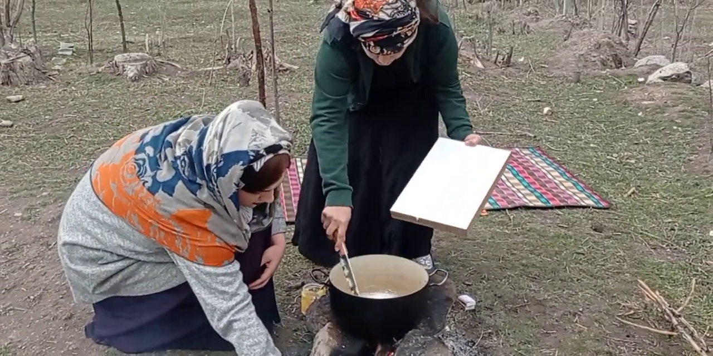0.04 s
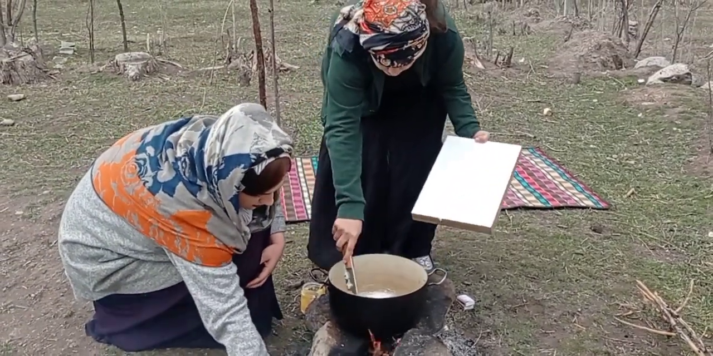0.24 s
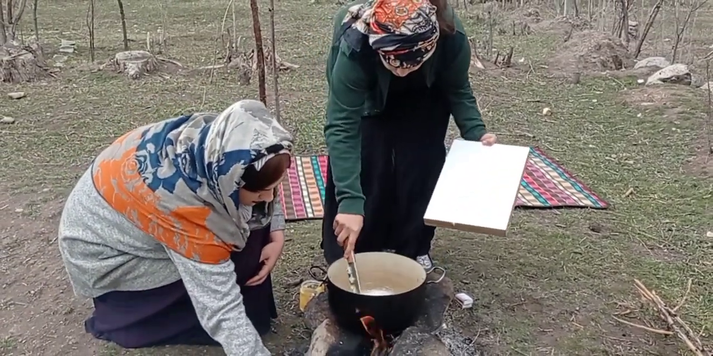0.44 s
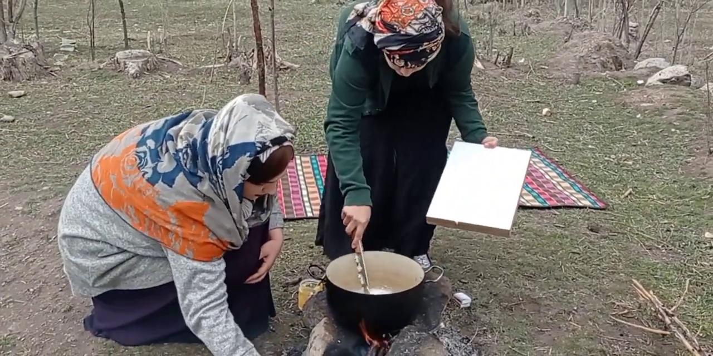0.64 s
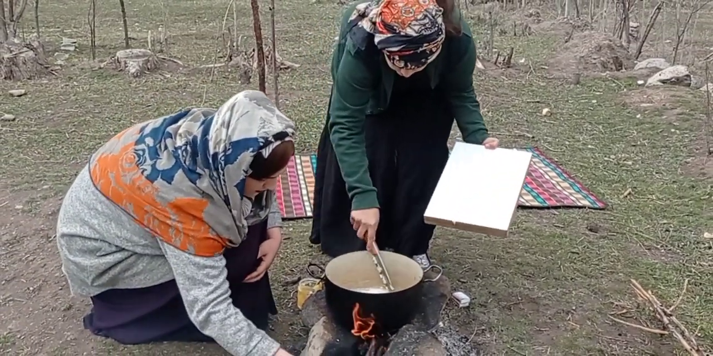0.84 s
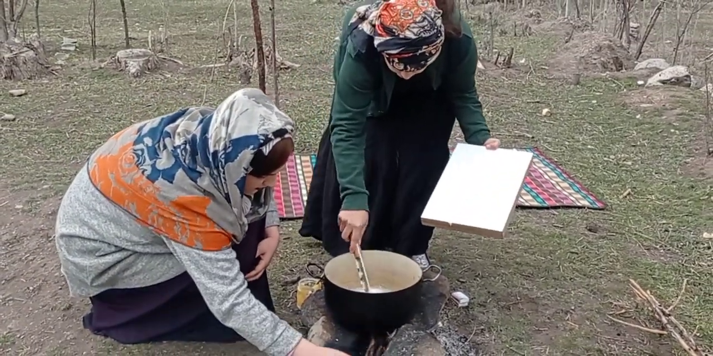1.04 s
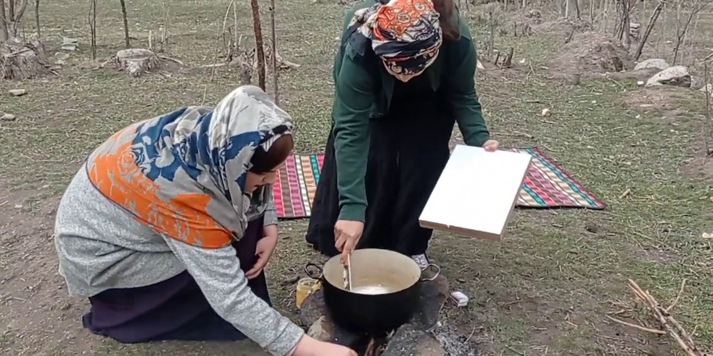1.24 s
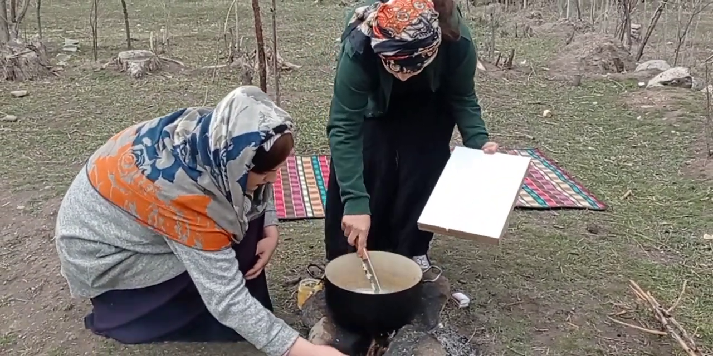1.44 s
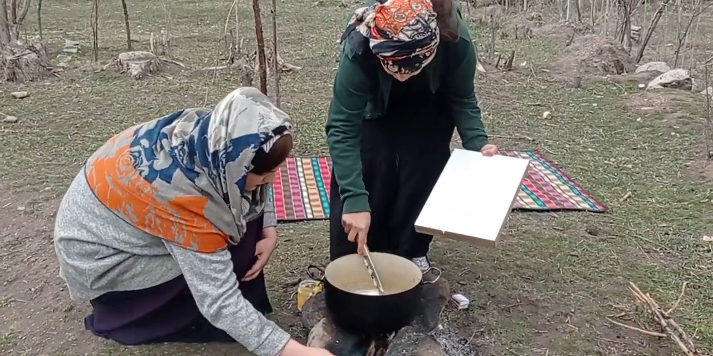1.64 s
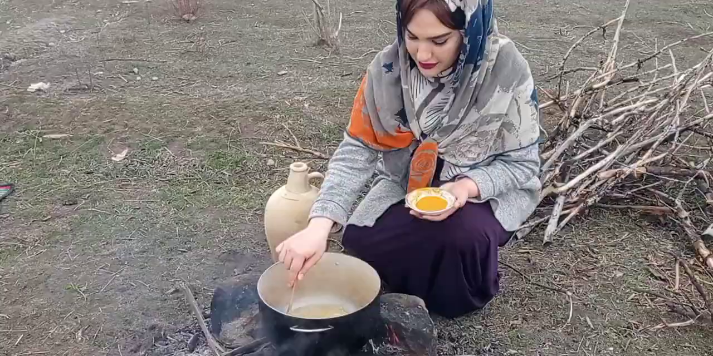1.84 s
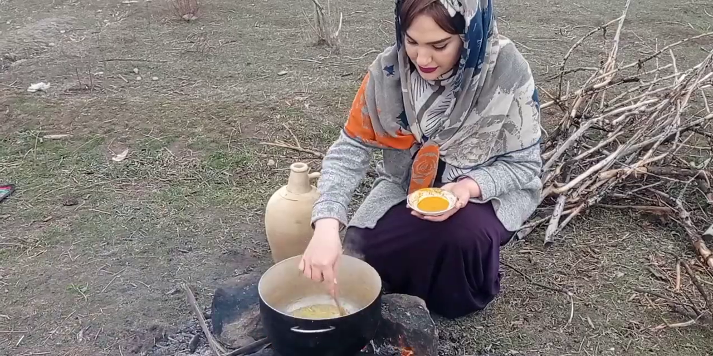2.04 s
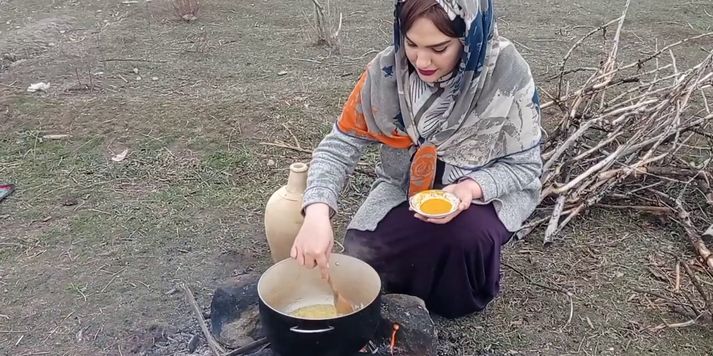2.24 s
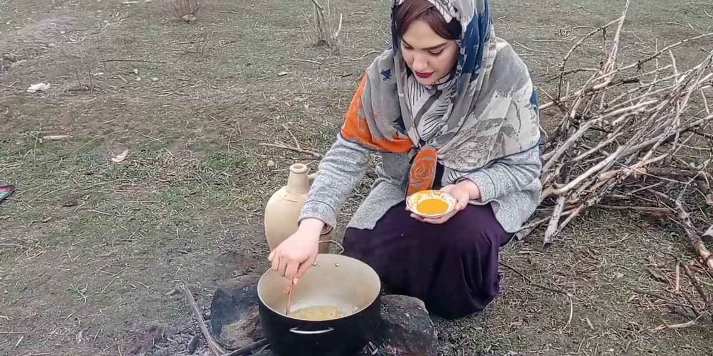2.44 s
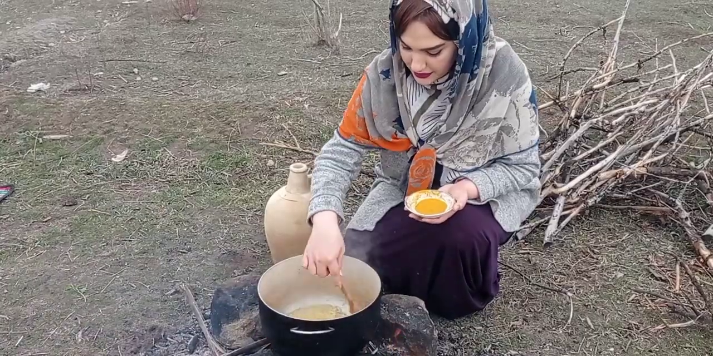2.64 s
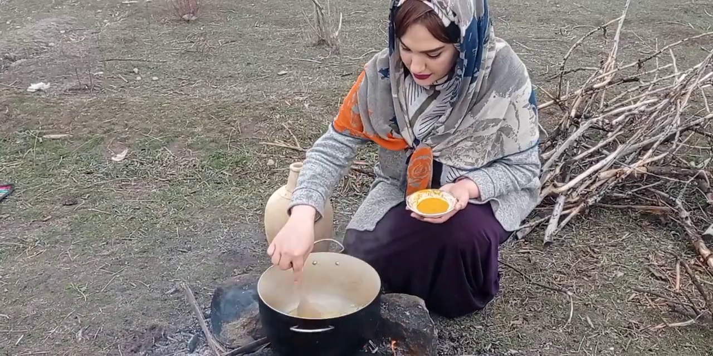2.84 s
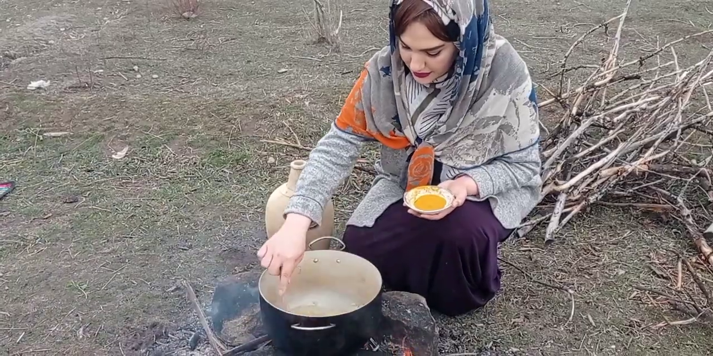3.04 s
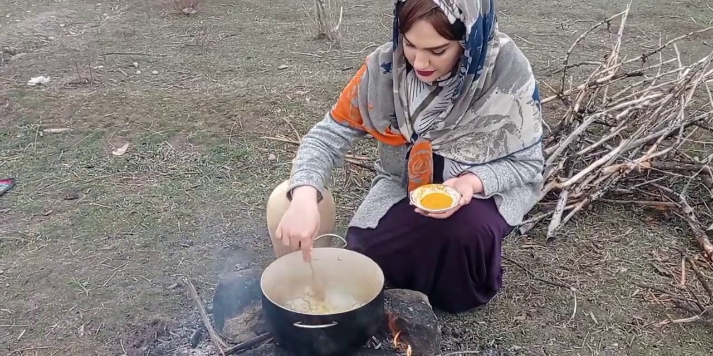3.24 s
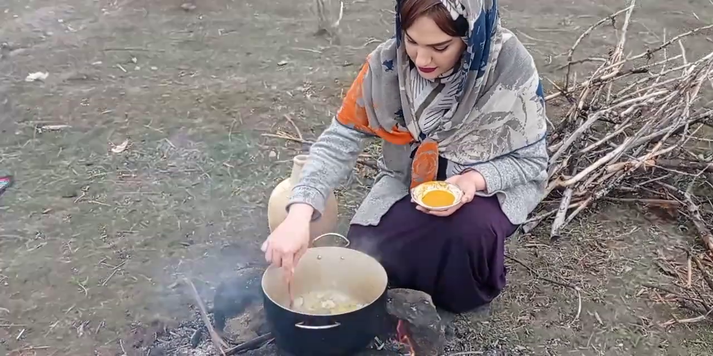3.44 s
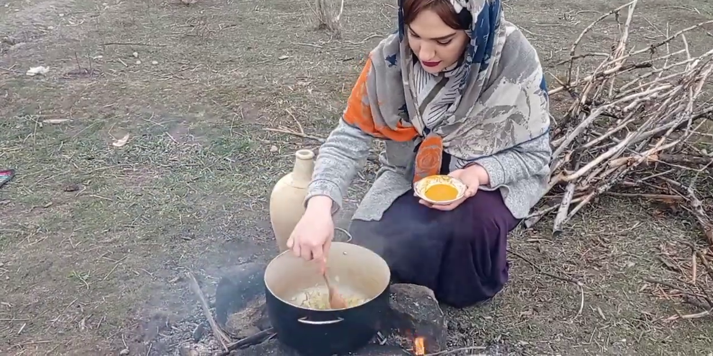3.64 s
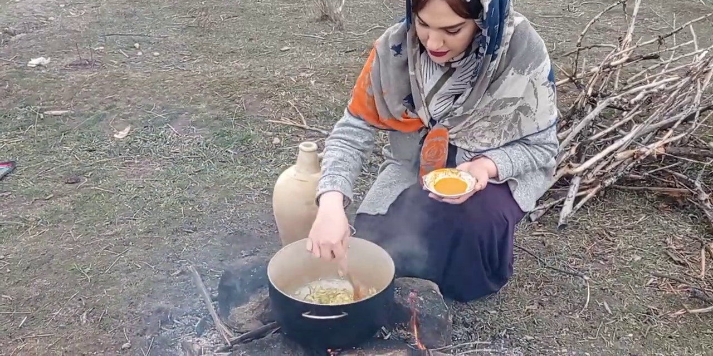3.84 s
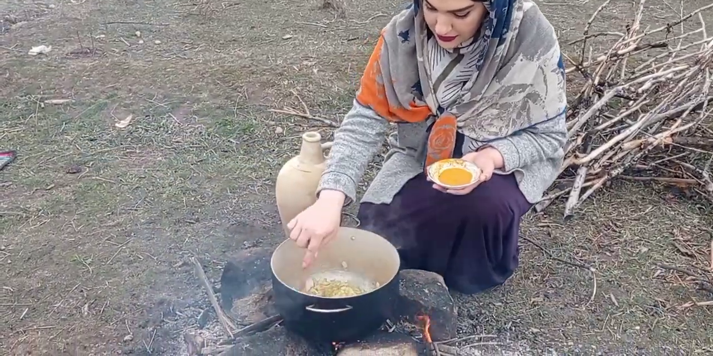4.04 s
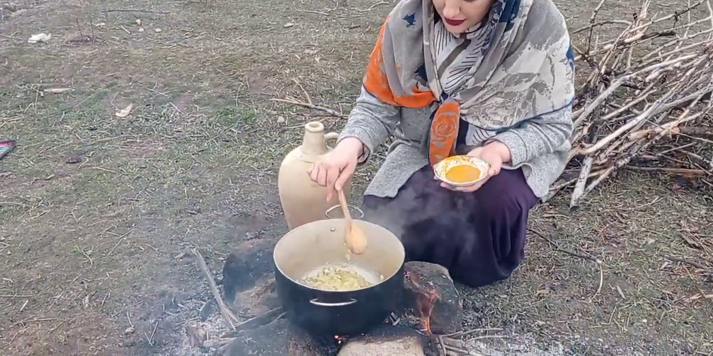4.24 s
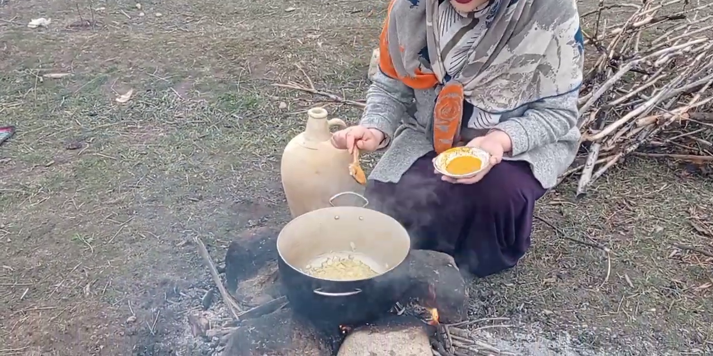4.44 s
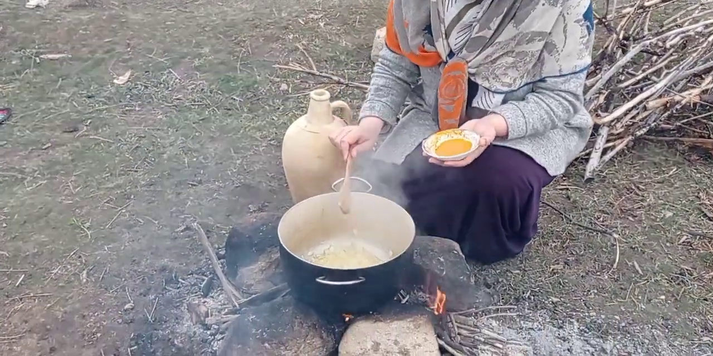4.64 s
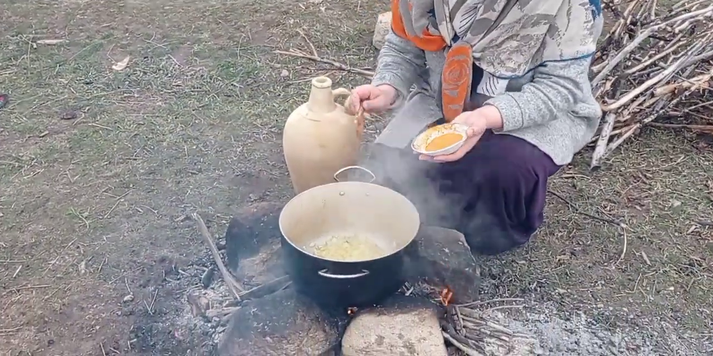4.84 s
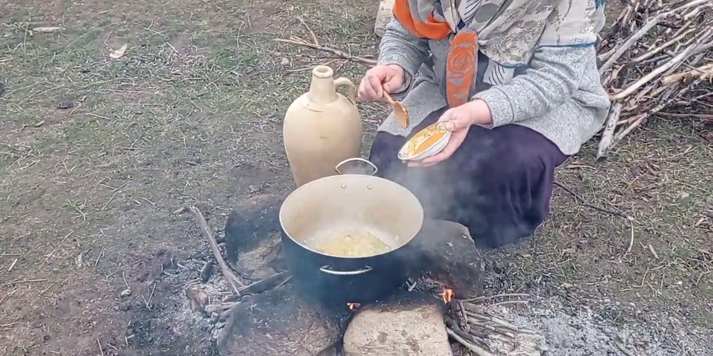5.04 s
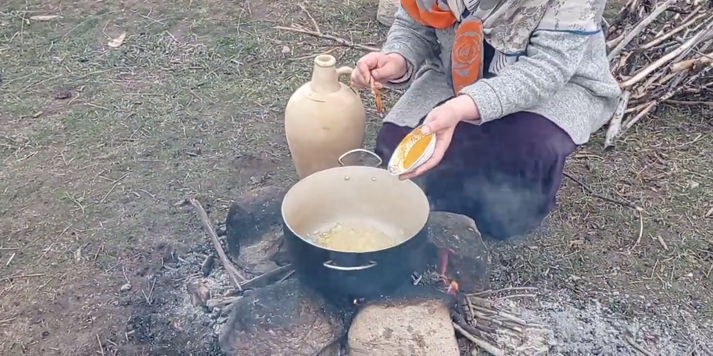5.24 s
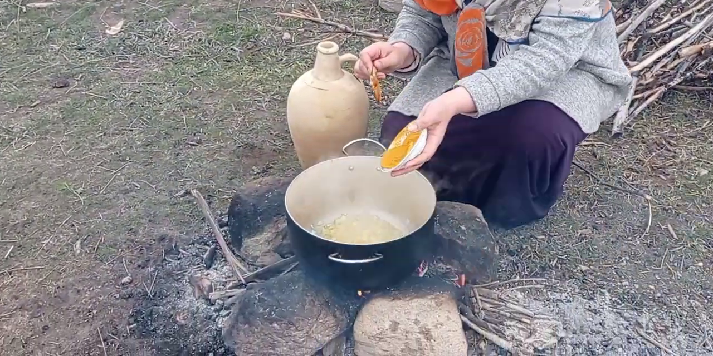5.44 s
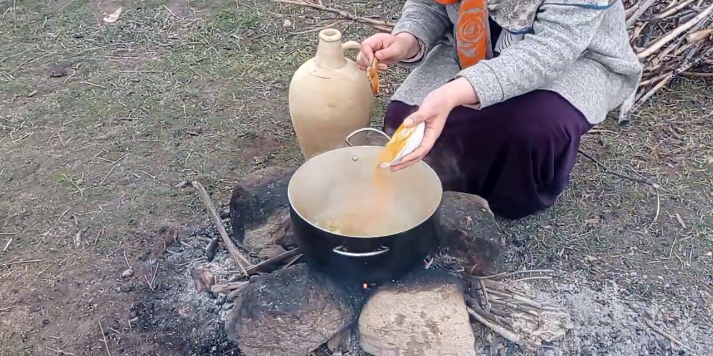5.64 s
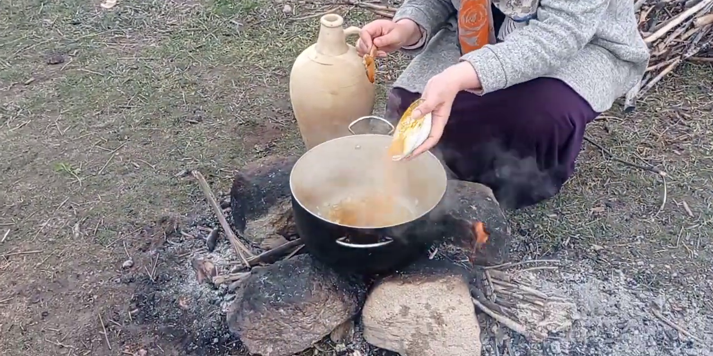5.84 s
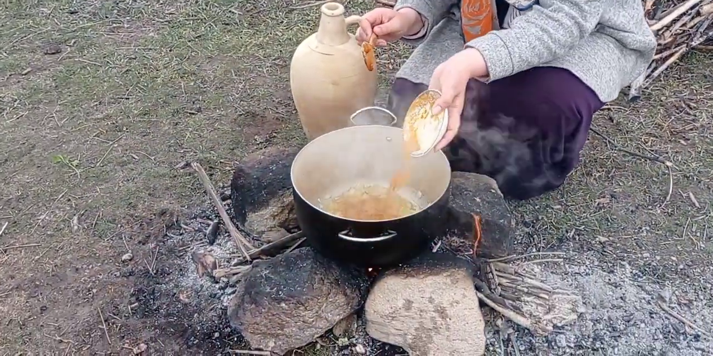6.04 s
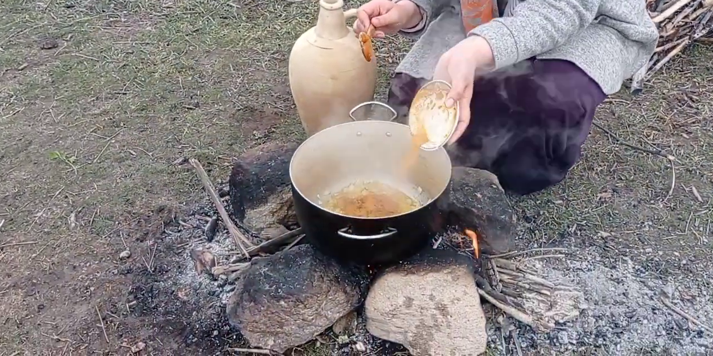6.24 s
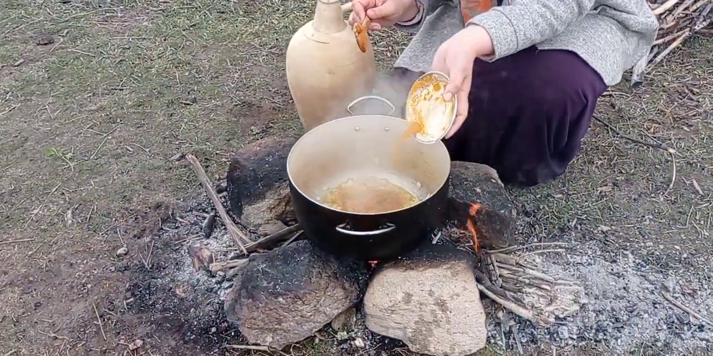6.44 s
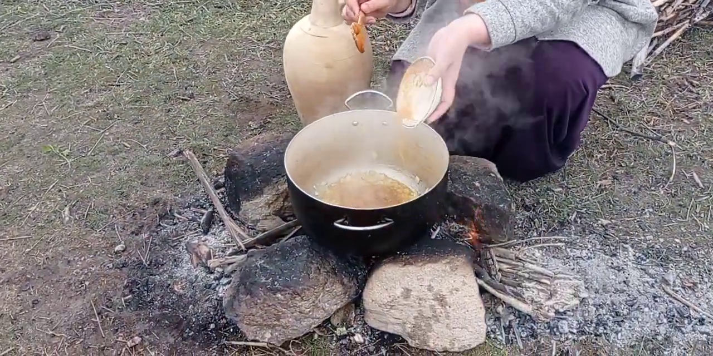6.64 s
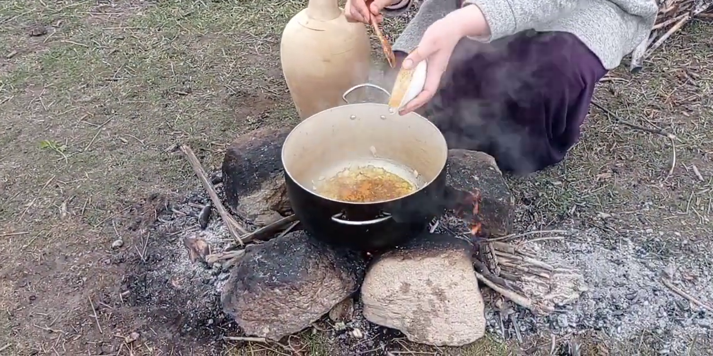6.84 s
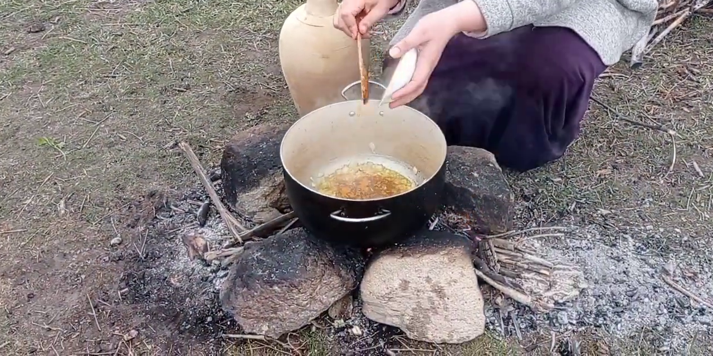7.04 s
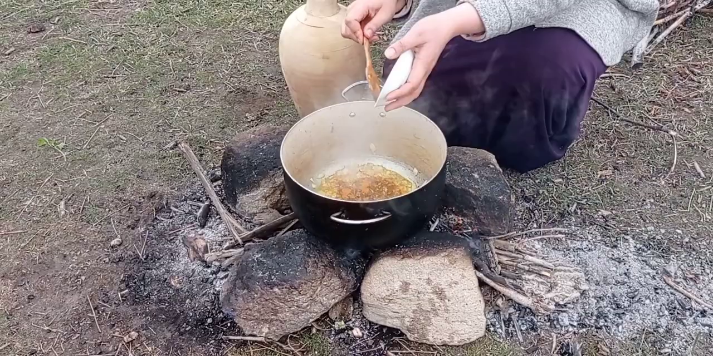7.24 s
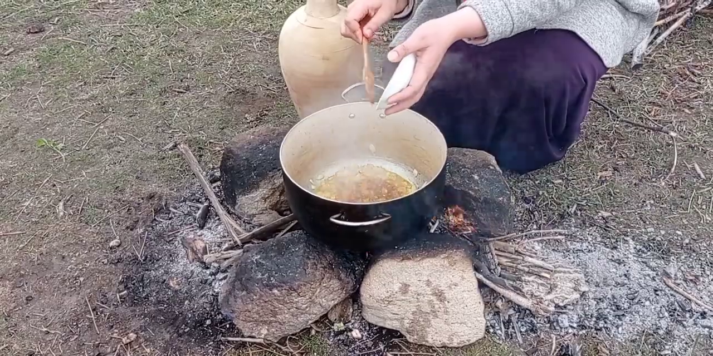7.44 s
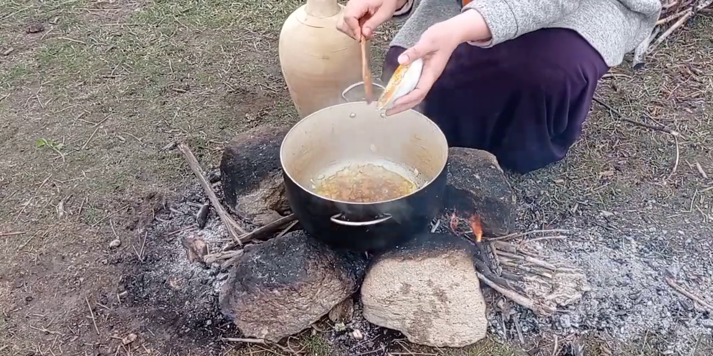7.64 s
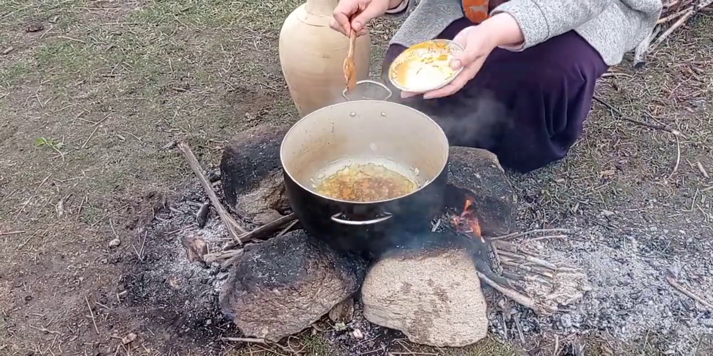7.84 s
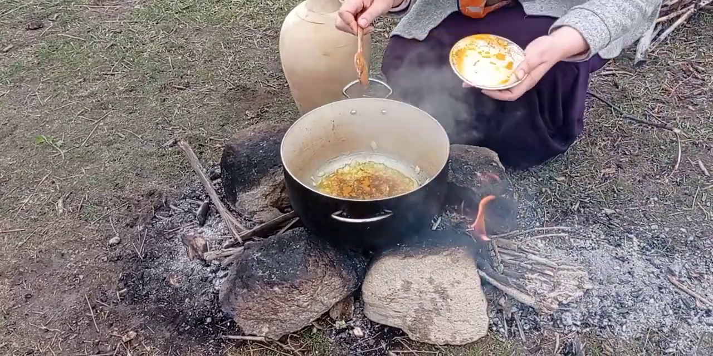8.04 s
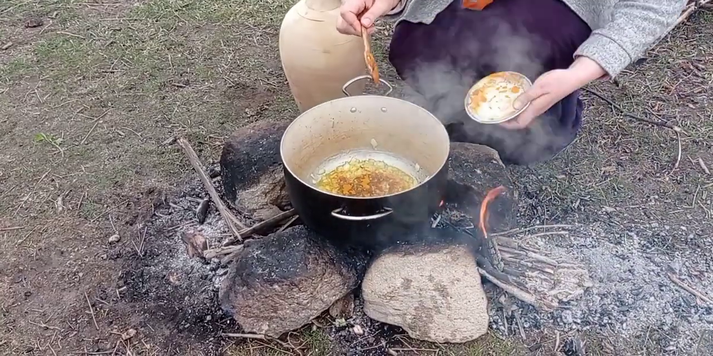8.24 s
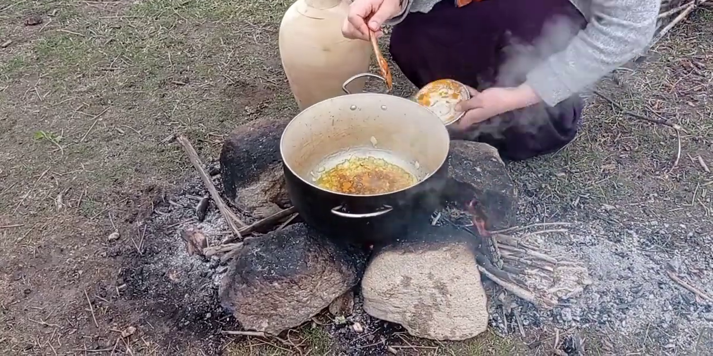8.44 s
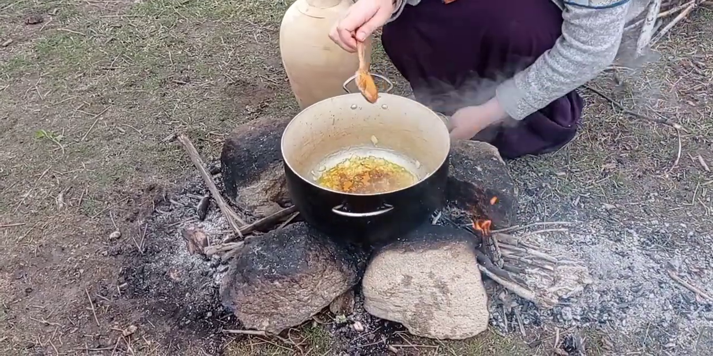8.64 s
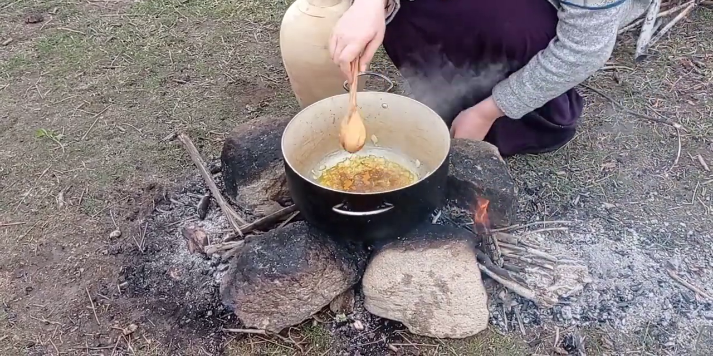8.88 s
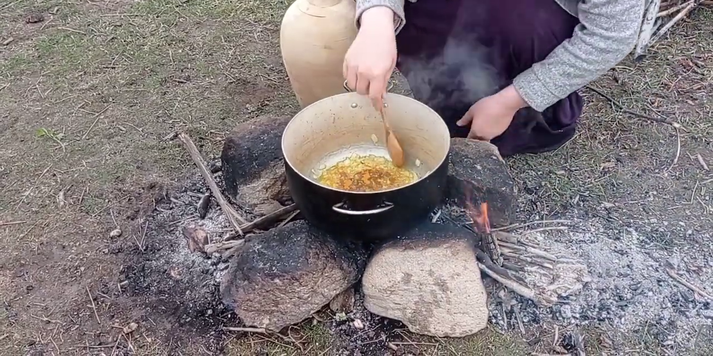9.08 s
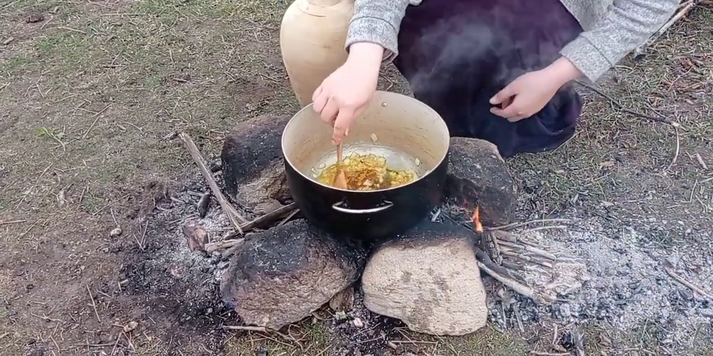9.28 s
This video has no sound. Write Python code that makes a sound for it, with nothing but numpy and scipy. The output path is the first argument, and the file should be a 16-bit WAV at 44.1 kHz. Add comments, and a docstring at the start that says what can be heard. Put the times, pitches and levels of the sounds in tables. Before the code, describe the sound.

Close windy frying and pot taps cut briefly to softer sizzling, whistling birds, wooden spoon rubbing, a ringing rim knock and small dish taps.

```python
"""Food fries in a metal pot over a wood fire outdoors: hissing noise coloured by the air in the pot, with sharp clicks.
First, close by and in gusty wind (low rumbling noise), a blade taps the pot: short dying tones.
After a brief break the frying is softer and birds whistle two main notes, as gliding sines with an echo.
A wooden spoon stirs with a rubbing noise and knocks the ringing rim; then spice falls with a soft swish
and the spoon taps a small dish. At the end the pot is tapped and scraped again."""
import sys
import numpy as np
from scipy import signal
from scipy.io import wavfile
from scipy.ndimage import uniform_filter1d

SR = 44100
rng = np.random.default_rng(int(sys.argv[2]) if len(sys.argv) > 2 else 0)


def bounce(signal):
    """Save signal as a 16-bit WAV file at the path given by the first command-line argument."""
    frames = np.transpose(np.atleast_2d(signal))
    limited = np.clip(frames, -1, 1)
    pcm = np.round(limited * 32767).astype(np.int16)
    wavfile.write(sys.argv[1], SR, pcm)


N = 410571  # length of the scene in samples

# Frying, one list before the break and one after.
# Columns: time_s, level_db (before a fixed trim), lower_hiss_db (relative)
FRYING_LEVELS = [
    [(0.0, -58, 4.5), (0.46, -55.5, -8.5), (1.0, -58.5, -6), (1.862, -57.5, -7)],
    [(1.89, -85, -18), (2.05, -72, -8), (2.32, -66.5, -10.5), (2.7, -68.5, -29), (2.96, -65.5, -3),
     (3.91, -64.5, -6.5), (4.4, -67.5, -15), (4.74, -65.5, 1), (5.25, -69, -4), (5.63, -65.5, 5),
     (7.05, -63, 1), (7.8, -72, -7), (8.13, -69.5, 2), (8.54, -63.5, 3.5), (9.31, -63, 1.5)],
]
# Tones of the wet pot floor.
# Columns: pitch_hz, level_db, ring_s (time to fall 60 dB, before a tap's ring factor)
FLOOR_TONES = [(400.4, -3, 0.061), (524, -3, 0.027), (724, -4, 0.017), (837.6, -6.5, 0.05),
               (888, -19.5, 0.13), (896, -1, 0.057), (1040, -42.5, 0.01), (1392, -8.5, 0.026),
               (1644, -7.5, 0.046), (2245, -3.5, 0.02), (2460, -12.5, 0.017), (3700, -2, 0.0057),
               (4470, -12, 0.012), (5575, -5.5, 0.023), (6530, -16, 0.046)]

SPICE_S = 6.32  # when the falling spice is loudest; from then on it muffles the seething food


def gain_of(db):
    """Turns decibels into amplitude."""
    return 10 ** (np.asarray(db) / 20)


def evened(x):
    """Scales a sound to an rms (average strength) of 1."""
    return x / np.sqrt(np.mean(abs(x) ** 2) + 1e-20)


def curve(tables, t):
    """Reads the table columns at times t; the first, a level, comes back as amplitude."""
    s, *columns = np.transpose(np.concatenate(tables))
    out = [np.interp(t, s, c) for c in columns]
    return [gain_of(out[0])] + out[1:]


def add(mix, s, sound):
    """Mixes a sound in at time s, in seconds."""
    part = mix[round(s * SR):][:len(sound)]
    part += sound[:len(part)]


def frames(size):
    """Gives times and frequencies of short-time spectra that step by a quarter frame."""
    times = np.arange(4 * N // size + 5) * size / 4 / SR
    return times, np.fft.rfftfreq(size, 1 / SR)[:, None]


def noise(power, patchy_db, flicker_db):
    """Makes noise from random spectra of equal loudness, then adds drifting patches and a shared flicker."""
    a, b, patch = rng.standard_normal((power.shape[1], power.shape[0], 3)).T
    flicker = evened(uniform_filter1d(patch, size=len(patch) // 4, axis=0))
    patch = uniform_filter1d(patch, size=5, axis=0)
    patch = evened(uniform_filter1d(patch, size=9, axis=1))
    spectra = (a + 1j * b) * np.sqrt(power / power.sum(0))
    spectra = spectra * gain_of(patchy_db * patch + flicker_db * flicker)
    half = len(spectra) - 1
    return evened(signal.istft(spectra, nperseg=2 * half, noverlap=3 * half // 2)[1][:N])


def smooth_random(shape):
    """Makes slow random wobble by averaging noise twice over 90 samples."""
    return evened(uniform_filter1d(uniform_filter1d(rng.standard_normal(shape), size=90), size=90))


def ring(modes, extra_db=0., damp=1., rise=0.00047, rough=1.0, spread_db=3.5, detune=0.0062):
    """Sums dying sines after a soft contact, weighted anew each time; a random flutter roughens the tones."""
    hz, db, t60 = np.transpose(modes)[:, :, None]
    t = np.arange(round(SR * t60.max() * damp)) / SR
    chance = rng.standard_normal((len(hz), 3))  # for pitch, starting phase and level
    flutter = smooth_random((len(hz), len(t)))
    turns = hz * (1 + detune * chance[:, :1]) * t + 0.18 * chance[:, 1:2]
    fading = gain_of(db + extra_db + spread_db * chance[:, 2:] - 60 * t / (t60 * damp))
    waves = fading * np.sin(2 * np.pi * turns)
    settled = 1 + rough * flutter * np.minimum(t / 0.0032, 1)  # the flutter grows in after the contact
    return (waves * settled).sum(0) * (1 - np.exp(-t / rise)) ** 2


def octaves_above(modes, base_hz):
    """Counts how many octaves each tone lies above a base pitch."""
    return np.log2(np.transpose(modes)[0] / base_hz)[:, None]


def resonances(hz):
    """Gives the power response of the air in the pot: peaks with steep sides."""
    # Air resonances. Columns: pitch_hz, width_hz, level_db
    pot_air = [(329, 116, -5), (465, 310, -11.5), (741, 110, -15), (905, 56, -1), (1417, 110, -7),
               (1647, 278, -6), (2040, 150, -6.5), (2260, 270, -5), (2865, 550, -9), (3240, 300, -6),
               (3692, 340, -2), (4310, 350, -8), (5220, 280, -12), (5380, 120, -4.5), (6300, 680, -20.5)]
    return sum(gain_of(2 * db) / (1 + (2 * (hz - f) / w) ** 2) ** 1.76 for f, w, db in pot_air)


def sizzle():
    """Dense bursting bubbles hiss in the pot's resonances; a sparse train of larger bursts modulates them."""
    # Sizzle colour, close by before the break. Columns: pitch_hz, level_db (per Hz)
    near_colour = [(590, -41), (1000, -27), (1120, -39), (1340, -46), (1610, -34), (1890, -29.5),
                   (2180, -12), (2560, -9.5), (3420, -1.5), (6180, 5), (10100, -19.5), (13400, -25),
                   (14900, -6.5), (16000, -11)]
    # Sizzle colour, farther off after the break. Columns: pitch_hz, level_db (per Hz)
    far_colour = [(590, -34.5), (1000, -24.5), (1250, -26.5), (1670, -14.5), (1910, -26.5), (2330, -11),
                  (3120, -12), (3840, -7.5), (4310, 3), (6110, 0), (8550, -26), (13400, -35),
                  (14900, -16.5), (16000, -37)]
    t, hz = frames(size=512)
    near, far = (np.interp(np.log(hz + 1), np.log(np.transpose(c)[0]), np.transpose(c)[1])
                 for c in (near_colour, far_colour))
    colour_db = np.where(t < FRYING_LEVELS[1][0][0], near, far)
    lower_db = curve(FRYING_LEVELS, t)[1] * np.clip(np.log2(4200 / (hz + 1)), 0, 1)
    power = gain_of(2 * (colour_db + lower_db)) * (resonances(hz) + gain_of(-14))
    hiss = noise(power, patchy_db=2.17, flicker_db=1.5)
    sizes = gain_of(3.86 * np.minimum(rng.exponential(1, N), 5))
    bursts = sizes * (rng.random(N) < 130 / SR)  # about 130 a second
    puff = signal.oaconvolve(bursts, np.exp(-np.arange(200) / (SR * .001)))[:N]  # each dies in about 1 ms
    level = gain_of(2.0) * curve(FRYING_LEVELS, np.arange(N) / SR)[0]
    return level * evened(hiss * (1 + 0.24 * puff))


def strokes(t):
    """Gives the loudness of the dragging, and its colour averaged over whatever drags, weighted by power."""
    # Strokes of blade or spoon over the pot floor. Columns: strongest_s, level_db, rise_s, fall_s,
    # brightness_db (per octave), depth_db (of the lowest resonances)
    drags = [(0.24, -59.5, .02, 0.2, -6, 1.5), (0.54, -62, 0.027, 0.17, -11.5, -2),
             (0.89, -68, 0.022, 0.22, -7, -5.5), (1.2, -52, 0.07, 0.13, -8.5, 3),
             (1.67, -64, .02, 0.23, -2.5, -6), (1.818, -62, 0.045, 0.16, -1, -9),
             (1.97, -70, .03, 0.19, -5.5, 12), (2.3, -65.5, 0.076, 0.071, -6.5, 3.5),
             (2.38, -70, .08, 0.038, -2, 8), (2.866, -59, 0.045, 0.049, 3.5, 15),
             (3.072, -59, 0.007, 0.16, -5.5, 13), (3.338, -63, 0.043, 0.027, -2, -9),
             (3.429, -56.5, 0.058, 0.2, -6.5, 3), (3.6, -61.5, 0.017, 0.07, -9, 5),
             (3.83, -57, 0.042, 0.59, -7.5, 3), (3.9, -55.5, .08, 0.051, -7.5, 2),
             (4.02, -55.5, 0.2, 0.17, 0, -0.5), (4.25, -67, 0.12, 0.25, 5, -10),
             (9.089, -48, 0.0046, .12, -2.5, 8), (9.17, -52, 0.11, 0.16, -7, 6),
             (9.25, -60, 0.13, 0.062, -16.5, 10)]
    range_db = 20  # how far the level changes within the rise and fall times
    seethe_db, seethe_bright_db, seethe_depth_db = -10.5, -2.5, 0.5  # level against the sizzle, then colour
    muffled_db = -4
    s, db, rise, fall, bright_db, depth_db = np.transpose(drags)[:, :, None]
    power = gain_of(2 * (db - range_db * np.maximum((s - t) / rise, (t - s) / fall)))
    # the food never lies still
    seethe = (gain_of(seethe_db + muffled_db * (t > SPICE_S)) * curve(FRYING_LEVELS, t)[0]) ** 2
    total = power.sum(0) + seethe
    mean_bright_db = ((power * bright_db).sum(0) + seethe * seethe_bright_db) / total
    mean_depth_db = ((power * depth_db).sum(0) + seethe * seethe_depth_db) / total
    return np.sqrt(total), mean_bright_db, mean_depth_db


def rubbing():
    """Blade, spoon and food drag over the pot floor; the friction noise takes the pot's resonances."""
    t, hz = frames(size=1024)
    _, bright_db, depth_db = strokes(t)
    colour_db = bright_db * np.log2(np.maximum(hz, 900) / 900) + depth_db * (hz < 620)
    power = (resonances(hz) + gain_of(-56.5)) * gain_of(2 * colour_db)
    power = power / (1 + (hz / 2900) ** 8) / (1 + (260 / (hz + 1)) ** 6)  # weaker treble and bass
    grit = 1 + 0.98 * evened(uniform_filter1d(rng.exponential(1, N) ** 3, size=300))
    coarse = np.arange(0, N, 32)
    level = np.interp(np.arange(N), coarse, strokes(coarse / SR)[0])
    return level * evened(noise(power, patchy_db=5.0, flicker_db=1.5) * grit)


def floor_taps():
    """Taps set the wet pot floor ringing; hardness and depth tilt the tones of each tap."""
    # Columns: start_s, level_db (before a fixed trim), depth_db (of the low tones),
    # hardness_db (per octave), ring_factor (kept within 0.3-3)
    taps = [(0.224, -25, -3.5, -8.5, 1.82), (0.527, -27.5, -5, -5.5, 2.7), (0.879, -22.5, -7, -23, 1.8),
            (0.888, -49, 3, 5, 3.3), (1.191, -15.5, -9, -19, 0.72), (1.321, -29, 0.5, -47, 2),
            (1.652, -27, -7, -9.5, 3.5), (1.664, -31, -4.5, -5, 3.4), (2.262, -50.5, -14, -18, 2.9),
            (2.857, -31, -3, -20, 1.74), (2.898, -37, -2, -8, 1.32), (3.068, -37, -23, 2, 1.03),
            (3.311, -55, -14, 14, 0.41), (3.335, -28, -24, -7, 0.52), (3.419, -29.5, -1.5, -14, 1.2),
            (3.444, -38.5, -22, -4, 2.6), (3.512, -43, 3.5, 2, 0.87), (3.602, -48.5, 19, -27, 1.03),
            (3.639, -47.5, -5, 1, 2), (3.809, -25.5, -4.5, -1, 0.72), (4.226, -45, -24, -6, 1.28),
            (4.547, -41.5, -20, 10.5, 0.87), (5.185, -58.5, -37, 11.5, 0.94), (8.908, -37.5, -2, 7.5, 0.4),
            (9.079, -24, 4.5, 8.5, 0.6)]
    out, octave = np.zeros(N), octaves_above(FLOOR_TONES, 900)
    for s, db, depth_db, hard_db, factor in taps:
        colour_db = depth_db * (octave < -.5) + hard_db * np.clip(octave, 0, 1.5)
        add(out, s, gain_of(db - 11.0) * ring(FLOOR_TONES, colour_db, np.clip(factor, .3, 3), rough=0.44))
    return out


def rim_knocks():
    """The spoon knocks the free rim, which rings long, and bounces softly; the floor rings along."""
    # Columns: start_s, level_db (before a fixed trim on the rim), hardness_db (per octave)
    knocks = [(4.6761, -28, 0.5), (4.6924, -34, -3)]
    # Tones of the rim. Columns: pitch_hz, level_db, ring_s (time to fall 60 dB, until it is stilled)
    rim = [(400, -11, 0.066), (432, -11, 0.7), (437, 2.5, 0.23), (516, 7, 0.11), (577, -15, 0.48),
           (869, -4, 0.26), (1210, -11, 0.26), (1430, -28, 0.93), (1552, -7, .16), (1854, -14.5, 0.15),
           (2200, -25, 0.12), (2440, -22, 0.1), (2600, -24, 0.15), (2760, -4.5, 0.11), (3095, -6, .09),
           (3332, -13, 0.22), (3580, -9.5, 0.17), (4020, -6.5, 0.17), (4210, -5.5, 0.066),
           (4580, -14, 0.22), (5200, -29, .2), (5800, -4.5, 0.092)]
    hushed_s = 4.85  # the spoon comes to rest on the rim and stills it
    out = np.zeros(N)
    for s, db, hard_db in knocks:
        wall = ring(rim, hard_db * octaves_above(rim, 441), rough=0.31, spread_db=2.5, detune=0.0011)
        hush_db = 1200 * np.maximum(s + np.arange(len(wall)) / SR - hushed_s, 0)
        add(out, s, gain_of(db - 9.0 - hush_db) * wall)
        floor_db = hard_db * np.maximum(octaves_above(FLOOR_TONES, 900), 0)
        add(out, s, gain_of(db) * ring(FLOOR_TONES, floor_db, 1.0, rough=0.18))
    return out


def dish_taps():
    """The spoon taps the dish: dull wood tones, and a dish ring where the fingers let it ring."""
    # Columns: start_s, level_db (before a fixed trim on the wood), free_ring_db (relative),
    # hardness_db (per octave)
    touches = [(6.649, -46.5, -9, 5.5), (6.698, -44, -21, -3), (6.962, -36, -23, 3.5),
               (7.016, -48.5, 5, 8.5), (7.034, -59, 4, -3), (7.186, -24.5, -26, -0.5),
               (7.258, -32, -9, 0.5), (7.334, -61, -20, 9), (7.411, -36, -30, -11), (7.428, -49.5, -21, 5),
               (7.45, -29, -0.5, 4), (7.617, -24.5, -33, -1), (7.633, -37, -3.5, 1)]
    # Tones of the wooden spoon. Columns: pitch_hz, level_db, ring_s (time to fall 60 dB)
    spoon = [(667, -14, 0.036), (920, -1, 0.019), (1490, -2, 0.014), (2360, -12.5, 0.019),
             (2964, -2, 0.017), (3960, -4, 0.0083), (5030, -16, 0.022)]
    # Tones of the dish. Columns: pitch_hz, level_db, ring_s (time to fall 60 dB)
    dish = [(2084, -0.5, 0.077), (4110, -2.5, 0.03), (6220, -11, 0.043)]
    out = np.zeros(N)
    for s, db, free_db, hard_db in touches:
        wood = ring(spoon, hard_db * octaves_above(spoon, 920), rough=0.8)
        add(out, s, gain_of(db - 6.5) * wood)
        dish_ring = ring(dish, rise=0.0012, rough=0.25, spread_db=3.0, detune=0.0018)
        add(out, s, gain_of(db + free_db) * dish_ring)
    return out


def pops():
    """Popping oil and fire and first contacts click: brief noise bursts with a thin tick of air on top."""
    # Columns: start_s, level_db (before a fixed trim), centre_hz,
    # air_db (above 9 kHz, relative, before a fixed trim)
    clicks = [(0.2249, -22.5, 4800, -38), (0.5278, -28.5, 5900, -29), (0.8789, -30.5, 3720, -25),
              (1.1877, -21.5, 5100, -21), (1.6507, -27, 5860, -30), (2.204, -37.5, 4540, -18),
              (2.274, -38, 4770, -35), (2.2947, -44, 4570, -36), (2.4767, -45, 3920, -41),
              (2.8555, -30.5, 4800, -37), (2.896, -33.5, 5200, -37), (2.9936, -40.5, 6260, -31),
              (3.066, -34, 3800, -38), (3.252, -41, 3800, -36), (3.312, -47, 5400, -34),
              (3.394, -26, 5200, -38), (3.512, -31.5, 4760, -38), (3.637, -35, 4530, -45),
              (3.71, -50, 6100, 5), (3.7344, -35, 5030, -8), (3.7487, -33, 3660, -21),
              (3.8083, -42.5, 3790, 1), (3.8496, -28, 4700, -42), (4.0178, -41, 4990, -45),
              (4.039, -35.5, 5240, -34), (4.5334, -29.5, 5100, -29), (4.5464, -31.5, 5560, -23),
              (4.572, -38, 4470, -18), (4.5858, -30, 5270, -42), (4.6769, -19, 5870, -15.5),
              (4.8065, -45, 5450, -33), (5.1844, -32, 5170, -21), (5.317, -46, 6680, -41),
              (5.64, -49.5, 4230, -1), (5.676, -39, 4700, -26), (6.1894, -41, 4080, -33),
              (6.4004, -31.5, 4120, -43), (6.628, -24.5, 4640, -44), (7.035, -36, 4000, -40),
              (7.0588, -33.5, 4400, -37), (7.078, -57, 5180, -28), (7.093, -39, 4270, -33),
              (7.11, -36, 4240, -32), (7.133, -43, 6400, -35), (7.3342, -59, 4330, -43),
              (9.0815, -30, 4080, -49)]
    out, t = np.zeros(N), np.arange(400) / SR
    shape = np.exp(-t / 0.0032) * (1 - np.exp(-t / 0.00028))
    for s, db, hz, air_db in clicks:
        body, tick = rng.standard_normal((2, 400))
        body = signal.lfilter(*signal.butter(2, [hz * 0.85, min(hz * 1.18, 7200)], "band", fs=SR), body)
        tick = signal.lfilter(*signal.butter(2, 9500, "high", fs=SR), tick)
        add(out, s, gain_of(db - 15) * (evened(body) + gain_of(air_db + 2.0) * evened(tick)) * shape)
    return out


def swells(rows, hz, width_hz, patchy_db):
    """Makes noise around one pitch that swells and sinks once per row (middle_s, length_s, level_db)."""
    t, f = frames(size=1024)
    power = np.ones(len(t)) / (1 + (2 * (f - hz) / width_hz) ** 2) ** 2
    now = np.arange(N) / SR
    level = sum(gain_of(db) * np.cos(np.pi * np.clip((now - s) / length, -.5, .5)) ** 2
                for s, length, db in rows)
    return level * noise(power, patchy_db, flicker_db=2.0)


def spice():
    """Spice powder is shaken into the pot: a soft swish of noise."""
    return swells([(SPICE_S, .8, -64.5)], hz=2120, width_hz=970, patchy_db=1.5)


def birds():
    """Birds whistle near-pure tones that glide onto a held pitch; the trees return a smeared echo."""
    # Columns: start_s, length_s, held_pitch_hz, level_db (rms),
    # swoop_hz (starting height above the held pitch)
    notes = [(1.89, 0.078, 3730, -71.5, 4), (1.98, 0.17, 3740, -78, 0), (1.994, 0.085, 4370, -66.5, 3),
             (2.176, .13, 4440, -57, 26.5), (2.197, 0.1, 3780, -68, 5.5), (2.409, 0.017, 6240, -62.5, 58),
             (2.435, 0.083, 3807, -52, 167), (2.781, 0.039, 4600, -56, 8), (2.8, 0.092, 4460, -52.5, 5),
             (2.996, 0.023, 6370, -61, 103), (3.026, 0.097, 3846, -50.5, 134),
             (3.49, 0.1, 4540, -56.5, 150), (3.711, 0.017, 6190, -51, -3), (3.74, 0.087, 3780, -55.5, 78),
             (7.759, 0.085, 4440, -65, 37), (8.153, 0.072, 3730, -72.5, -3), (8.286, 0.081, 4360, -57.5, 0),
             (8.518, .1, 3745, -69.5, 1.5), (8.796, .1, 4400, -59.5, 10), (9.02, 0.05, 3800, -69, 146)]
    swoop_s, edge_share = 0.013, 0.31  # glide time; soft ends as a share of the note
    fade_db = -1.5  # change by the end of the note
    out = np.zeros(N)
    for s, length, hz, db, swoop_hz in notes:
        t = np.arange(0, length, 1 / SR)
        wave = np.sin(2 * np.pi * np.cumsum(hz + swoop_hz * np.exp(-t / swoop_s)) / SR)
        level = np.sqrt(2) * gain_of(db + fade_db * t / length)
        add(out, s, level * wave * signal.windows.tukey(len(t), edge_share))
    t = np.arange(SR // 2) / SR
    trees = rng.standard_normal(len(t)) * gain_of(-60 * t / 1.0) * (t > .04)  # starts after 40 ms
    return out + gain_of(-11) * signal.fftconvolve(out, trees / np.linalg.norm(trees))[:N]


def wind():
    """Wind on the microphone makes a lumpy rumble; a force column sets how high the rumble reaches."""
    # One list before the break and one after.
    # Columns: time_s, level_db (before a fixed trim), force (0-1, brightens the wind)
    gusts = [
        [(0.0, -41.5, 0.02), (0.42, -48.5, 0.52), (0.5, -55.5, 0.15), (0.6, -37.5, 0.38), (0.83, -41, 0.24),
         (1.1, -41.5, 0.62), (1.22, -31, 0.59), (1.44, -33, 0.5), (1.61, -60, 0.36), (1.79, -34.5, 0.39),
         (1.862, -47.5, 0.42)],
        [(1.89, -79, 0.28), (3.3, -76.5, 0.52), (4.1, -65.5, 0), (4.45, -74, .6), (5.4, -72, 0.42),
         (5.75, -63.5, 0), (6.0, -77.5, .6), (7.4, -70.5, .2), (8.0, -66, 0.15), (8.75, -72.5, 0.3),
         (9.31, -57, 0.2)],
    ]
    t, hz = frames(size=2048)
    top_hz = 80 + 200 * np.clip(curve(gusts, t)[1], 0, 1.5)
    power = 1 / (1 + (105 / (hz + 1)) ** 2.2) / (1 + (hz / 130) ** 1.2) / (1 + (hz / top_hz) ** 7) + 1e-12
    wobble = uniform_filter1d(uniform_filter1d(rng.standard_normal(N), size=900), size=900)
    lumps = gain_of(4.06 * evened(wobble))
    level = gain_of(1.0) * curve(gusts, np.arange(N) / SR)[0]
    return level * evened(noise(power, patchy_db=3.0, flicker_db=3.5) * lumps)


def bumps():
    """Wind buffets and handling make soft bumps: single, mostly low tones that die within a few cycles."""
    # Columns: start_s, level_db (before a fixed trim), pitch_hz
    thuds = [(.113, -27.5, 88), (0.245, -33, 98), (0.384, -33.5, 102), (.588, -26.5, 95), (.652, -30.5, 89),
             (.71, -29.5, 124), (.79, -28.5, 110), (0.913, -34, 188), (1.034, -40, 114),
             (1.134, -28.5, 243), (1.158, -27, 145), (1.231, -18.5, 141), (1.275, -35, 104),
             (1.312, -22, 108), (1.342, -18, 138), (1.536, -33, 106), (1.64, -34, 77.5), (1.765, -29, 130),
             (3.156, -55.5, 115), (3.376, -57, 119), (3.78, -53, 81), (4.142, -45, 101),
             (4.595, -37.5, 191), (5.067, -40.5, 215), (5.25, -56, 92), (5.565, -47, 141),
             (5.66, -48.5, 79.6), (5.78, -48.5, 137), (7.566, -50.5, 81), (7.786, -46.5, 96),
             (8.25, -44, 96), (9.157, -37, 470), (9.179, -42, 593), (9.221, -45, 112)]
    out = np.zeros(N)
    for s, db, hz in thuds:
        add(out, s, gain_of(db + 8.5) * ring([(hz, 0, 4.6 / hz)], rise=0.29 / hz, rough=0, spread_db=1.5))
    return out


def rustle():
    """A short rustle: grainy noise above about 9 kHz that starts at once and fades."""
    start_s, length_s, level_db, fade_db = 3.7, 0.14, -73, -16
    t = np.arange(0, length_s, 1 / SR)
    grains = rng.standard_normal(SR) * uniform_filter1d(rng.exponential(1, SR) ** 3, size=60)
    treble = signal.lfilter(*signal.butter(4, 9800, "high", fs=SR), grains[:len(t)])
    shape = gain_of(level_db + fade_db * t / length_s) * np.minimum(t / .006, 1)
    out = np.zeros(N)
    add(out, start_s, shape * evened(treble))
    return out


def hum():
    """A faint fuzzy low hum, a narrow band of noise, comes and goes."""
    # Columns: middle_s, length_s, level_db
    hum_swells = [(2.73, 0.24, -73), (5.32, 0.15, -75), (6.23, .1, -70), (6.41, 0.33, -70.5),
                  (8.63, 0.11, -72), (8.85, 0.53, -77)]
    return swells(hum_swells, hz=337, width_hz=57, patchy_db=-1.5)


def air():
    """The faint murmur of open country is broad, soft noise; one very long swell keeps it steady."""
    return swells([(N / SR / 2, 20 * N / SR, -83.5)], hz=584, width_hz=1200, patchy_db=0.5)


def scene():
    """Adds all sources at one microphone, with a break that leaves only a trace of noise."""
    break_start_s, break_end_s = 1.858, 1.888
    t = np.arange(N) / SR
    playing = np.clip(np.maximum(break_start_s - t, t - break_end_s) / .003 + 1, 0, 1)  # 3 ms fades
    mix = sizzle() + rubbing() + floor_taps() + rim_knocks() + dish_taps() + spice() + pops()
    mix = mix + birds() + wind() + bumps() + rustle() + hum() + air()
    return (mix * playing + gain_of(-100) * rng.standard_normal(N))[None]


def record(dry):
    """The microphone cuts the bass below 66 Hz, then the treble ends at 15650 Hz."""
    thin = signal.sosfilt(signal.butter(3, 66, "high", fs=SR, output="sos"), dry)
    return signal.oaconvolve(thin, signal.firwin(511, 15650, window=("kaiser", 9), fs=SR)[None], "same")


dry = scene()
out = record(dry)
bounce(out)
```